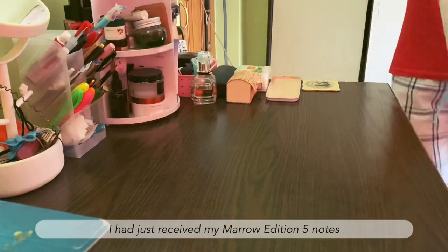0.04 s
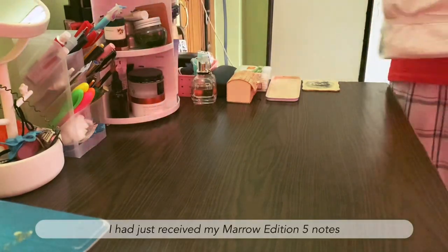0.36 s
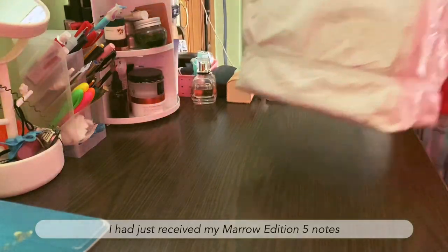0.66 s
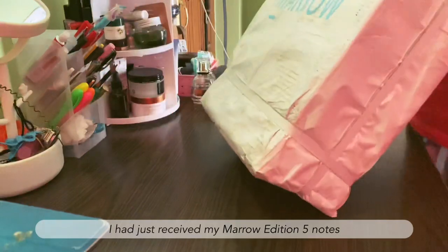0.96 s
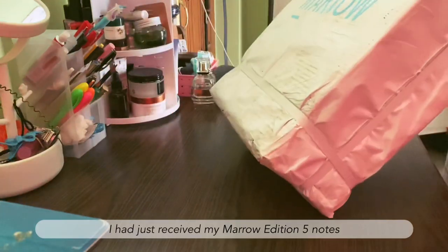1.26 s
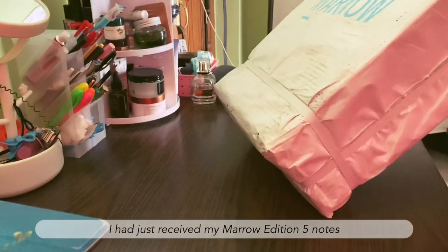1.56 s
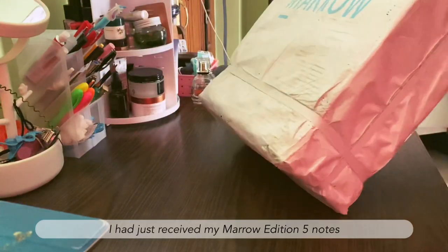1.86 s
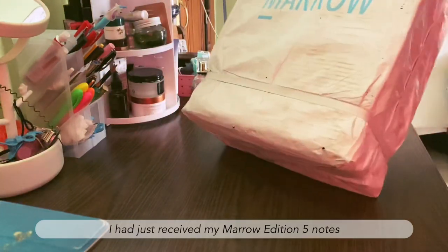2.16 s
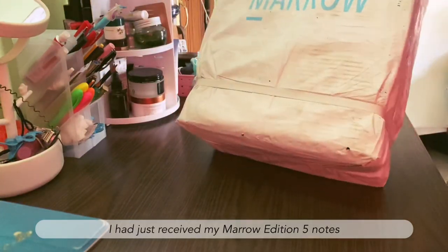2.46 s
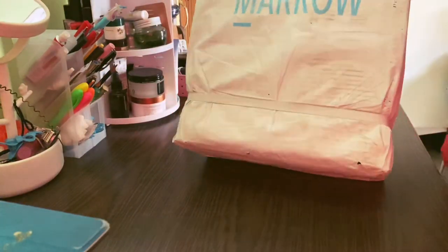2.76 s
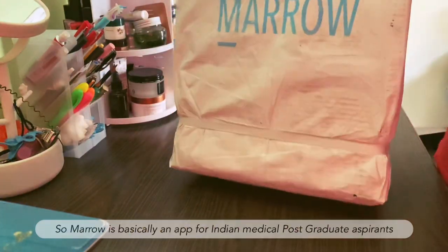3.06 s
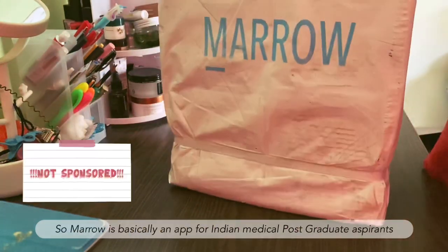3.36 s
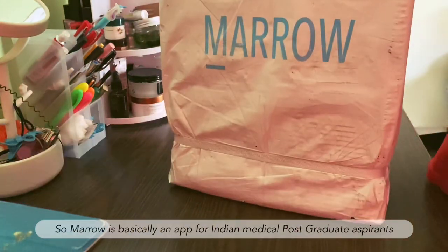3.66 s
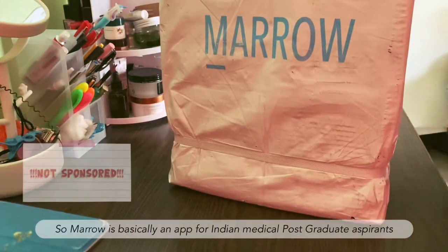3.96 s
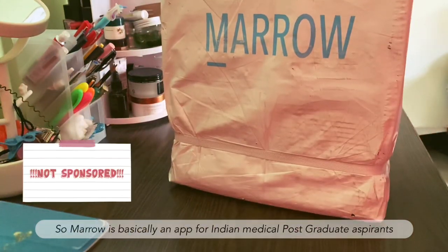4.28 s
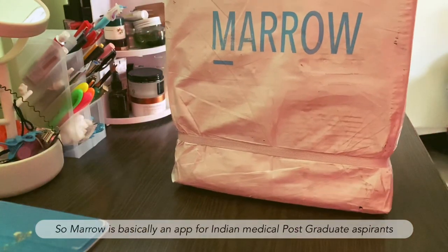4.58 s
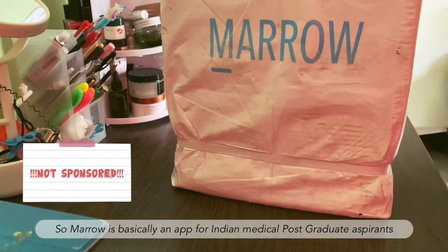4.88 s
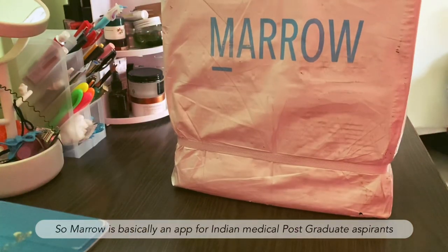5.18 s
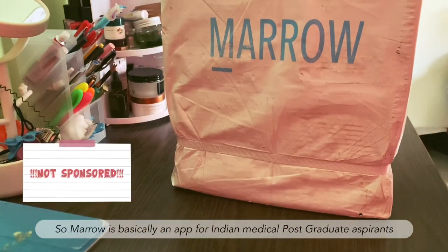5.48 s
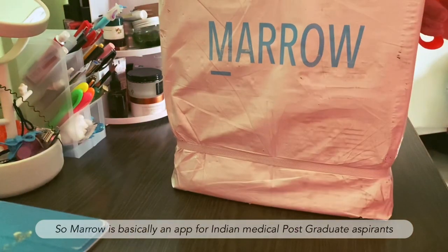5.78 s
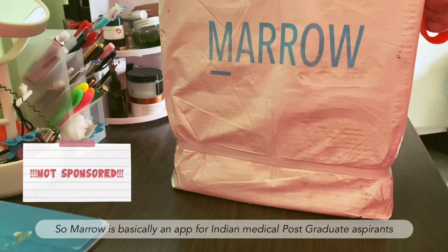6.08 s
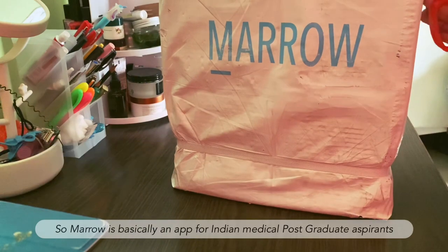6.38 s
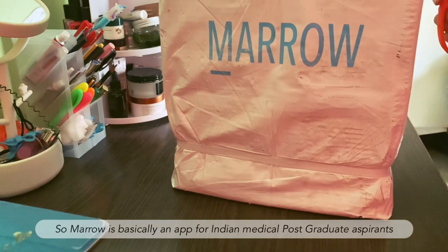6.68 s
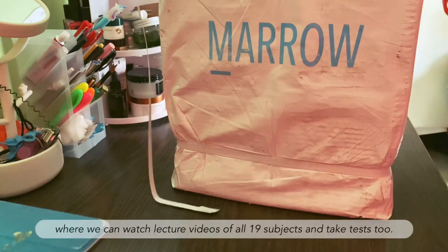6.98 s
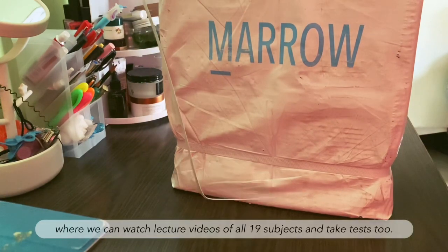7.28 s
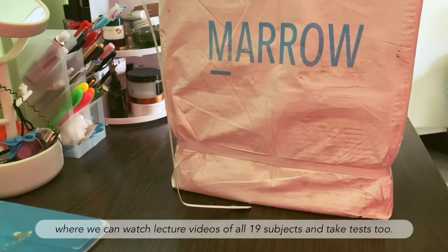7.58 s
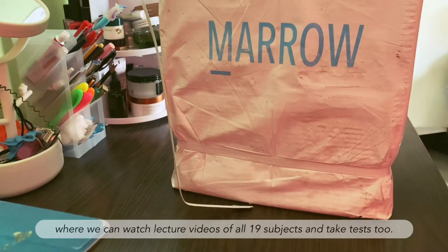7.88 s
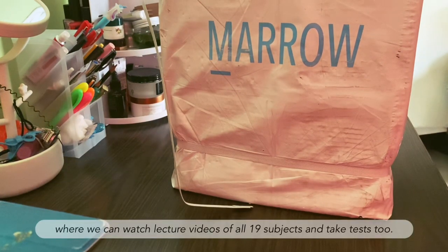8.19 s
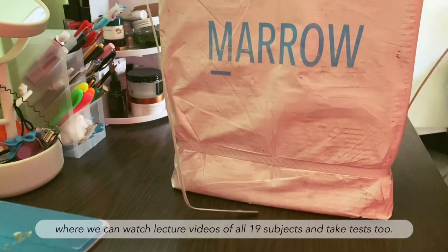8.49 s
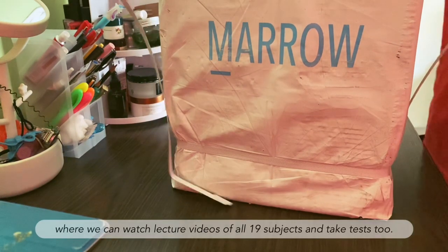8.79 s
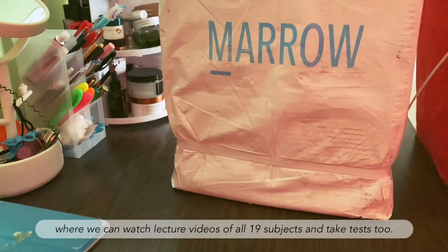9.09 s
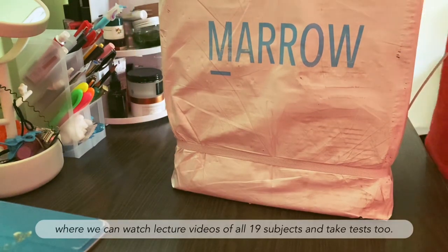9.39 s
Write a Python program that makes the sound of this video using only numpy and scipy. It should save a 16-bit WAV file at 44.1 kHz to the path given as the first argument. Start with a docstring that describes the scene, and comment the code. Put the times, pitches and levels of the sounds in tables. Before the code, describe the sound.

A heavy parcel of books in a plastic wrapper lands on a wooden desk with a ringing thud. It is swivelled with a soft scraping hiss, then settles with cracks and crinkles. Two hollow pops sound nearby. The parcel is slapped, and a cord drags, squeaks faintly and taps over the plastic, clacking on the desk. The microphone is close, in a small room with low ventilation rumble.

```python
"""Ventilation rumbles in a small room, around a phone standing on a wooden desk. A heavy parcel of books
in a plastic mailer lands and sets the desk's modes ringing. It is swivelled on its corner with a hiss of
friction, then settles upright as its seam cracks and its creases buckle. Two hollow pops sound nearby.
The parcel is slapped and the books knock inside; last, a cord drags and squeaks over the crinkling
wrapper by stick and slip, taps it, and clacks on the desk."""
import sys
import numpy as np
from scipy import signal
from scipy.fft import rfft, irfft, next_fast_len
from scipy.io import wavfile

SR = 44100
rng = np.random.default_rng(int(sys.argv[2]) if len(sys.argv) > 2 else 0)


def digitize_waveform(pressure):
    """Quantize a signal to 16-bit integers and store it at the path in sys.argv[1].

    Rows of a 2-D input are taken as channels; values are limited to [-1, 1].
    """
    field = np.atleast_2d(pressure).T
    bounded = np.clip(field, -1, 1)
    quanta = np.round(bounded * 32767).astype(np.int16)
    wavfile.write(sys.argv[1], SR, quanta)


N = 420713
TIME = np.arange(N) / SR

# Levels are relative within a source. Each row of a _COLOUR table: frequency in Hz, gain in dB.
AIR_COLOUR = [(25, -17.5), (52, -2.5), (80, -10), (125, -5), (215, -12.5), (270, -8), (360, -14.5),
              (470, -13), (800, -18), (1500, -24), (3000, -31), (7000, -44.5), (12000, -53), (16000, -62)]
# Low resonances of the room. Each row: frequency in Hz, width in Hz, level in dB.
ROOM_MODES = [(48.5, 12, -60.5), (112.2, 24.4, -63), (344, 87, -58)]

# The hand rubs the wrapper. Each row: start in seconds, length in seconds, level in dB.
HAND_RUBS = [(0.024, 0.23, -67), (0.553, 0.13, -59.5), (0.992, 0.053, -55), (1.168, 0.11, -59),
             (2.843, 0.32, -60), (4.659, 0.24, -57), (5.044, 0.075, -59.5), (5.468, 0.44, -62),
             (8.754, 0.49, -62), (9.2, 0.39, -60)]
# The cord drags over it. Each row: start in seconds, length in seconds, level in dB, resonance in Hz.
CORD_DRAGS = [(6.211, 0.039, -57, 2100), (6.342, 0.094, -54, 6800), (6.595, 0.12, -57, 4210),
              (6.733, 0.099, -56, 3600), (6.809, 0.063, -45.5, 3540), (6.928, 0.027, -49.5, 4500),
              (6.952, 0.097, -63.5, 3620), (7.114, 0.055, -49, 2450), (7.371, 0.11, -53.5, 2800),
              (7.473, 0.071, -77, 4190), (7.623, 0.038, -55, 5060), (8.09, 0.15, -65.5, 3960),
              (8.478, 0.07, -46.5, 3220), (8.558, 0.41, -59.5, 4400)]
RUSTLE_COLOUR = [(400, 5), (1000, -2), (2200, 2.5), (4000, -0.5), (6000, -5), (11000, -13), (16000, -18)]

# Modes of the desk top. Each row: frequency in Hz, level in dB, t60 in seconds.
DESK_MODES = [(64.5, -4, 0.37), (91, 5, 0.12), (109, -14.5, 0.52), (161.5, -8.5, 0.16), (228.4, -20, 0.24),
              (271.8, -13.5, 0.24), (310, -20, 0.26), (345, -5, 0.073), (382, -2.5, 0.053),
              (424, -9, 0.099), (564, -6.5, 0.09), (605, -6, 0.083), (663, -12, 0.053), (754, -37, 0.11),
              (860, -30, 0.18)]
# The parcel's edge, full weight, rebounds and rocking. Each row: start in seconds, push in dB.
PUSHES = [(0.743, -7.5), (.7520, -1.5), (0.7597, 0), (0.793, -32), (0.832, -15), (1.022, -35), (3.049, -40),
          (3.21, -33.5), (3.69, -50), (5.051, -36.5)]
BOOKS_COLOUR = [(25, -11), (52, -5), (80, -15), (120, -12), (180, 1), (380, -13), (620, -10.5), (850, -15),
                (2000, -38.5)]
# The wrapper is crushed under the weight. Each row: start in seconds, level in dB, t60 in seconds.
CRUSHES = [(0.7426, -24, 0.075), (.754, -22.5, 0.07), (.767, -20.5, 0.074), (.80, -36.5, 0.37),
           (.915, -46.5, 0.25)]
CRUSH_COLOUR = [(250, -28), (700, 0), (1050, 4), (1400, 5), (1750, -1.5), (2400, 2.5), (3800, -3),
                (6000, -10.5), (11000, -16.5), (16000, -23)]
# Edge and cord knock on the desk. Each row: start in seconds, level in dB, t60 in seconds.
KNOCKS = [(.7432, -16, .035), (5.049, -41, .08), (7.2, -41, 0.028), (8.7345, -34, .028), (8.879, -40, .03),
          (8.8991, -43, 0.056), (9.3595, -48, .025)]
KNOCK_COLOUR = [(120, -7), (350, -5.5), (620, 3.5), (850, 3), (1300, 2), (1900, -4.5), (2800, -15),
                (5000, -20), (12000, -34)]

# Creases buckle; the cord taps the wrapper. Each row: start in seconds, level in dB, ring in Hz.
CREASES = [(1.003, -44.5, 2584), (1.18, -53.5, 3600), (1.354, -64, 4400), (2.861, -47, 1700),
           (2.873, -50, 1700), (2.91, -46, 1730), (3.067, -43, 2800), (3.073, -49, 2000),
           (3.154, -44.5, 1910), (3.165, -41.5, 1720), (3.176, -45.5, 1500), (3.19, -47, 2200),
           (3.2, -35.5, 1750), (3.225, -41, 1700), (3.242, -39.5, 2260), (3.248, -48, 1700),
           (3.302, -49, 2600), (3.369, -50, 2780), (4.698, -48, 2100), (4.771, -53, 2400),
           (5.049, -53, 1500), (5.474, -53.5, 2480), (5.631, -50.5, 3280), (5.956, -52, 4300),
           (6.027, -58.5, 3820), (6.175, -55.5, 4200), (6.219, -55, 3200), (6.333, -52, 4000)]
CORD_TAPS = [(6.65, -53.5, 4050), (6.744, -60, 2640), (6.848, -41.5, 2870), (6.935, -56.5, 4400),
             (6.978, -55, 2400), (7.083, -50.5, 2620), (7.121, -50, 2330), (7.338, -63.5, 2790),
             (7.422, -59, 2830), (7.596, -59, 4270), (7.918, -50, 2620), (8.488, -45.5, 2950),
             (8.522, -36.5, 3200), (8.622, -50, 2480), (8.663, -55.5, 3180), (8.734, -36, 2500),
             (8.813, -57, 3300), (8.879, -45, 1880), (8.9, -54, 2600), (9.036, -49, 2230),
             (9.268, -50.5, 3040), (9.359, -47.5, 2000)]

# The corner slides as the parcel turns. Each row: time in seconds, level in dB.
SWIVEL = [(1.57, -75), (1.642, -56), (1.728, -51), (1.914, -46), (2.15, -48), (2.646, -50.5), (2.716, -70),
          (2.76, -56.5)]
# Resonances of the wrapper under that corner. Each row: frequency in Hz, width in Hz, level in dB.
SLIDE_MODES = [(1510, 200, -9.5), (2000, 420, -10), (2865, 260, -11), (3720, 450, -13), (4570, 380, -17),
               (6850, 420, -15)]
SLIDE_COLOUR = [(400, -2.5), (900, 2), (1250, 4), (1600, 3.5), (2800, 6.5), (4200, 3), (5500, -4),
                (7200, -6.5), (11000, -8.5), (16000, -14)]
# The bottom seam unfolds. Each row: start in seconds, level in dB, t60 in seconds.
SEAM_CRACKS = [(3.0062, -30.5, .014), (3.0095, -39, .012), (3.0668, -38, .008)]
SEAM_COLOUR = [(300, -8), (800, -1), (1150, 1), (1500, 7), (2000, -3), (3000, -10), (4500, -8), (6000, -10),
               (7500, -9), (9500, -23), (16000, -32)]
CREAK_COLOUR = [(50, -2), (150, 1), (400, 2.5), (750, 4), (1500, -9), (3000, -8), (5000, -17),
                (8000, -23.5)]

# Pops. Each row: start in seconds, level in dB, pitch in Hz, t60 in seconds, left minus right in dB.
POPS = [(4.8343, -14.5, 1150, 0.0045, -13.5), (5.0496, -21, 1450, 0.0026, -10)]

SLAP_COLOUR = [(40, -7), (90, 0), (185, -6), (270, -9.5), (410, 2), (620, 2), (950, -2), (1300, -4.5),
               (1800, -4), (2500, -4.5), (3300, -11.5), (4400, -12), (6000, -19.5), (11500, -22),
               (16000, -25)]
SLAP_SHADOW_COLOUR = [(2000, -1), (3500, -3.5), (7000, -6.5), (15000, -5)]  # the parcel shades the walls from the smack
# Modes of the slapped stack of books. Each row: frequency in Hz, level in dB, t60 in seconds.
STACK_MODES = [(62.4, -31, .2), (189, -26, .12), (325, -33, 0.078), (417, -13.5, .024), (489, -31, .17),
               (771, -37, 0.17), (865, -42, 0.11), (926, -35, 0.17), (1290, -41, .15), (1540, -39, 0.16),
               (1800, -41, 0.14), (1870, -34.5, 0.08), (2060, -34, .1)]
# The parcel gives under the slap. Each row: start in seconds, level in dB, t60 in seconds.
GIVES = [(6.2486, -31, 0.025), (6.2553, -29.5, 0.047), (6.264, -32, 0.13)]
GIVE_COLOUR = [(50, -8), (110, 6), (200, -2), (330, -5), (440, 1.5), (620, -0.5), (900, 1), (1400, 0),
               (2100, -0.5), (2700, -4), (3600, -10), (4500, -12), (6000, -21), (11000, -29), (16000, -34)]

# The cord catches on the film. Each row: start in seconds, length in seconds, level in dB, pitch in Hz.
SQUEAKS = [(6.632, 0.031, -59, 3940), (6.638, .02, -58, 5330), (6.82, .035, -54, 3600),
           (6.827, .022, -52, 2290), (6.928, .025, -55, 4500), (7.117, .035, -53, 2250),
           (7.137, .03, -55, 2750), (7.39, .06, -60, 2950)]
# The wrapper is gripped or pulled. Each row: start in seconds, length in seconds, level in dB.
CRINKLES = [(6.8, .08, -58), (7.201, 0.066, -55), (8.484, 0.066, -49), (8.57, .13, -60.5),
            (8.741, 0.19, -57), (9.283, 0.13, -63)]
# The cord's stiff end hits the desk. Each row: start in seconds, level in dB, t60 in seconds.
CORD_CLACK = [(7.1995, -26.5, 0.017)]
CLACK_COLOUR = [(300, -19), (800, -11), (1080, -1.5), (1550, -8), (2150, 3), (2600, 3), (3100, -11),
                (3700, -10), (4200, -12), (5000, -17), (6200, -12), (6900, -6), (8100, -8), (9500, -22),
                (12000, -21), (16000, -26)]

# Reflections off the desk and the jars on it. Each row: delay in seconds, gain in dB.
ECHOES = [(.0012, -33), (.0037, -16.5), (.0096, -16.5)]
# Reverberation time. Each row: frequency in Hz, t60 in seconds.
ROOM_T60 = [(100, 0.39), (1000, 0.24), (3000, 0.33), (12000, 0.35)]
ROOM_COLOUR = [(60, -7), (120, -6.5), (220, -1), (500, -3), (1300, 1), (2000, -0.5), (3000, -2.5),
               (7000, -0.5), (15000, -2.5)]
PORT_COLOUR = [(5500, 0), (7000, 2.5), (8500, 0.5), (11000, 3.5), (15000, 3.5)]  # treble lift of both microphone ports
SIDE_COLOUR = [(60, -19), (110, -12.5), (380, -6.5), (700, -1), (1300, -1), (2400, -4.5), (4400, -8),
               (5500, 0), (7000, -29), (15000, -21)]  # side relative to mid
# Imbalance of the ports. Each row: frequency in Hz, left minus right in dB.
PORT_BALANCE = [(100, -1.2), (200, -2), (380, -4.5), (700, -1), (1300, -1), (2400, 1.5), (4400, 2.2),
                (9000, .3)]

FOLD_HZ, TOP_HZ = 2160, 15900  # ring of a reference fold; upper limit of the phone


def undb(db):
    """Decibels to amplitude ratio."""
    return 10 ** (np.asarray(db) / 20)


def unit(x):
    """Normalisation to rms 1."""
    return x / np.sqrt(np.mean(x ** 2))


def at_hz(points, hz):
    """Interpolation of (Hz, value) points on a log-frequency axis."""
    f, value = np.transpose(points)
    return np.interp(np.log(np.maximum(hz, 1)), np.log(f), value)


def colour(x, points, size=4096):
    """Minimum-phase filtering by (Hz, dB) points, through the folded cepstrum."""
    gain = undb(at_hz(points, np.fft.rfftfreq(size, 1 / SR)))
    cepstrum = irfft(np.log(gain))
    cepstrum[1:size // 2] *= 2
    cepstrum[size // 2 + 1:] = 0
    response = irfft(np.exp(rfft(cepstrum)))
    return signal.oaconvolve(x, response[None], axes=-1)[:, :x.shape[1]]


def band(x, lo_hz, hi_hz, order=2):
    """Butterworth band-pass filtering."""
    edges = [lo_hz, min(hi_hz, SR / 2 - 1)]
    return signal.sosfilt(signal.butter(order, edges, "band", fs=SR, output="sos"), x)


def noise(count):
    """Uncorrelated white noise for mid and side."""
    return rng.standard_normal((2, count))


def fade(t, t60):
    """Exponential decay, 60 dB down after t60."""
    return np.exp(-np.log(1000) * t / t60)


def walk(rate, count=N):
    """Random modulation of rms 1, through rate knots a second."""
    knots = rng.standard_normal(4096)
    return unit(np.interp(TIME[:count] * rate, np.arange(len(knots)), knots))


def arch(length_s, taper=0.65, skew=0.88):
    """Envelope of one stroke: a skewed sine arch that peaks just before its middle."""
    return np.abs(np.sin(np.pi * (TIME[:int(length_s * SR)] / length_s) ** skew)) ** taper


def add(track, s, sound):
    """Superposition of a sound on a track at s seconds."""
    start = int(s * SR)
    track[:, start:start + sound.shape[1]] += sound[:, :track.shape[1] - start]


def modes(table, t):
    """Free vibration: a sum of damped sinusoids from (Hz, dB, t60) rows."""
    return sum(undb(db) * np.sin(2 * np.pi * hz * t) * fade(t, t60) for hz, db, t60 in table)


def burst(points, t60, count=16384):
    """Densely overlapping modes decay like coloured noise; starts near rms 1."""
    envelope = fade(TIME[:count], t60)
    return unit(colour(noise(count) * envelope, points)) * np.sqrt(np.mean(envelope ** 2))


def blows(table, points):
    """Impact excitation: one burst of the given colour for each (s, dB, t60) row."""
    out = np.zeros((2, N))
    for s, db, t60 in table:
        add(out, s, undb(db) * burst(points, t60))
    return out


def grains(count, rate, spread_db):
    """Shot noise: tiny slips of random size, on average rate a second."""
    slips = noise(count) * (rng.random(count) < rate / SR)
    hit = np.flatnonzero(slips[0])
    slips[:, hit] *= undb(spread_db * np.minimum(rng.exponential(size=len(hit)), 4))
    return unit(slips)


def ventilation(level_db=-51.5, waver_db=0.9):
    """Broadband ventilation noise excites the room's low resonances, under faint hiss."""
    out = undb(level_db) * unit(colour(noise(N), AIR_COLOUR))
    drive = noise(N)
    for hz, width_hz, db in ROOM_MODES:
        out += undb(db + waver_db * walk(14)) * unit(band(drive, hz - width_hz / 2, hz + width_hz / 2))
    return out


def film_resonance(hz, width_hz, count, wander, rate):
    """A randomly driven resonance gives narrow-band noise; its pitch wanders with the film's tension."""
    smooth = signal.butter(2, min(width_hz / 2, SR / 4), fs=SR, output="sos")
    drive = signal.sosfilt(smooth, noise(count) + 1j * noise(count))
    phase = 2 * np.pi * np.cumsum(hz * (1 + wander * walk(rate, count))) / SR
    return unit(np.real(drive * np.exp(1j * phase)))


def stroke(slips, s, length_s, hz, treble_db, hiss_db, film_db, width_share, split_hz=6000, catch_db=4):
    """Stick-slip friction: slips hiss while the stretched film catches and rings in spurts."""
    gain = arch(length_s)
    count = len(gain)
    slips = np.take(slips, int(s * SR) + np.arange(count), axis=1, mode="wrap")
    film = film_resonance(hz, hz * width_share, count, wander=0.083, rate=60)
    film = unit(film * undb(catch_db * walk(137, count)))
    hiss = unit(band(slips, 600, split_hz))
    treble = unit(band(slips, split_hz, TOP_HZ, order=3))
    return gain * (undb(hiss_db) * hiss + undb(film_db) * film + undb(treble_db) * treble)


def rustle(hand_db=-7, cord_db=-5):
    """Friction on the wrapper: mostly broad hiss under the hand, more resonant under the cord."""
    out = np.zeros((2, N))
    slips = colour(grains(N, rate=2000, spread_db=0.5), RUSTLE_COLOUR) * undb(3 * walk(110))
    for s, length_s, db in HAND_RUBS:
        rub = stroke(slips, s, length_s, 1540, treble_db=-2.5, hiss_db=2.5, film_db=-12, width_share=0.17)
        add(out, s, undb(db + hand_db) * rub)
    for s, length_s, db, hz in CORD_DRAGS:
        treble_db = -5 + 5.5 * np.log2(hz / FOLD_HZ)  # a faster drag rings higher and hisses more
        drag = stroke(slips, s, length_s, hz, treble_db, hiss_db=0, film_db=-2.5, width_share=0.27)
        add(out, s, undb(db + cord_db) * drag)
    return out


def crush(t60, count=16384):
    """Many folds collapse in quick succession as decaying shot noise; starts near rms 1."""
    envelope = fade(TIME[:count], t60)
    folds = grains(count, rate=5000, spread_db=1) * envelope
    return unit(colour(folds, CRUSH_COLOUR)) * np.sqrt(np.mean(envelope ** 2))


def desk(contact_s):
    """Modal response to a half-sine force: a longer contact excites only the low modes."""
    t = TIME[:SR // 2]
    push = np.sin(np.pi * t[t < contact_s] / contact_s)
    return np.outer([1, 0], signal.fftconvolve(modes(DESK_MODES, t), push / push.sum()))


def landing(desk_db=-8, books_db=-14, crush_db=2, contact_s=0.00098, rest_s=0.955, rest_t60=0.1):
    """Impacts ring the desk until the resting load damps it; the books thud and crush the wrapper."""
    out = np.zeros((2, N))
    for s, db in PUSHES:
        ring = desk(contact_s * 2 ** (-db / 18))  # contact time doubles for each 18 dB less force
        since_rest = np.maximum(TIME[:ring.shape[1]] - max(rest_s - s, 0), 0)
        damping = fade(since_rest, rest_t60 if s < rest_s else 4 * rest_t60)
        add(out, s, undb(db + desk_db) * ring * damping)
        add(out, s, undb(db + books_db) * burst(BOOKS_COLOUR, t60=0.083))
    for s, db, t60 in CRUSHES:
        add(out, s, undb(db + crush_db) * crush(t60))
    return out


def knocks():
    """Impacts of the parcel's edge and the cord excite quickly damped vibration in the wood."""
    return blows(KNOCKS, KNOCK_COLOUR)


def snap(hz, treble_db, rise_s=0.00053, body_lag_s=0.00087, count=2048):
    """A fold lets go; bending waves disperse, so the bright tick and ring precede the dull body."""
    t = TIME[:count]
    attack = 1 - np.exp(-t / rise_s)
    release = undb(-8) * unit(np.outer([1, 0], signal.unit_impulse(count)))
    tick = unit(band(release + unit(noise(count) * attack * fade(t, 0.019)), 4800, 10800, order=1))
    ring = unit(band(release + unit(noise(count) * attack * fade(t, 0.0082)), hz / 2.22, hz * 1.46))
    body = unit(band(noise(count), 485, 1120) * attack * fade(t, 0.021))
    octaves = np.log2(hz / FOLD_HZ)  # smaller folds ring higher, with more tick and less body
    out = ring + undb(treble_db + 13 * octaves) * tick
    add(out, body_lag_s, undb(-3 - 9 * octaves) * body)
    return out


def snaps(gain_db=-11, crease_treble_db=-16, cord_treble_db=-9.5, stray_db=-71):
    """Buckling creases and cord taps shock the film; the cord, the harder striker, sounds brighter."""
    out = np.zeros((2, N))
    for table, treble_db in (CREASES, crease_treble_db), (CORD_TAPS, cord_treble_db):
        for s, db, hz in table:
            add(out, s, undb(db + gain_db) * snap(hz, treble_db))
    # Faint stray ticks: only those drawn before the scene ends are heard.
    for when, size, pitch in rng.uniform(-0.78, 1, (12, 3)):
        s = min(np.interp(when, [-1, 1], [8, 17]), TIME[-1])
        hz = 2640 * 2 ** (0.73 * pitch)
        add(out, s, undb(stray_db - 11.5 * size) * snap(hz, cord_treble_db))
    return out


def glide(gain, split_hz=6000, pivot_hz=2800, waver_db=2.5, fast_db=-45.5, range_db=4, count=65536):
    """Sliding friction hisses and drives wavering resonances; faster sliding is louder and brighter."""
    slips = unit(colour(grains(count, rate=6900, spread_db=-0.5), SLIDE_COLOUR))
    slips *= undb(1.1 * walk(29.9, count))
    low = unit(band(slips, 440, split_hz, order=4))[:, :len(gain)]
    high = unit(band(slips, split_hz, 19500, order=4))[:, :len(gain)]
    speed_db = np.clip(20 * np.log10(gain + 1e-9) - fast_db, -range_db, 0) + range_db / 2
    for hz, width_hz, mode_db in SLIDE_MODES:
        level = undb(mode_db + waver_db * walk(13.74, count))
        ring = level * film_resonance(hz, width_hz, count, wander=0.04, rate=6)
        tilt_db = 0.8 * speed_db * np.log2(hz / pivot_hz)
        low += undb(tilt_db) * ring[:, :len(gain)]
    treble_db = np.interp(gain, undb([fast_db - range_db, fast_db]), [-5, 3])
    return gain * (low + undb(treble_db) * high)


def slide(gain_db=-3.5, nudge_s=4.325, nudge_db=-53.5):
    """The corner rubs over the wood as the parcel is swivelled and later nudged straight."""
    out = np.zeros((2, N))
    s, db = np.transpose(SWIVEL)
    swivel = undb(np.interp(np.arange(s[0], s[-1], 1 / SR), s, db))
    nudge = undb(nudge_db) * arch(length_s=0.305, taper=1.1, skew=0.92)
    add(out, s[0], glide(swivel))
    add(out, nudge_s, glide(nudge))
    return undb(gain_db) * out


def seam_cracks():
    """The stiff bottom seam releases elastic energy in brief cracks as it unfolds."""
    return blows(SEAM_CRACKS, SEAM_COLOUR)


def settle(start_s=3.14, length_s=0.256, ramp_s=0.041, level_db=-43.5, crinkle_db=-18, count=16384):
    """Under load the bottom yields in tiny slips, creaking and crinkling, then relaxes."""
    out, t = np.zeros((2, N)), TIME[:count]
    creak = unit(colour(grains(count, rate=1300, spread_db=0.5), CREAK_COLOUR))
    crinkle = unit(colour(grains(count, rate=1700, spread_db=-1), RUSTLE_COLOUR))
    envelope = np.clip(np.minimum(t, length_s - t) / ramp_s, 0, 1) * fade(t, t60=1)
    add(out, start_s, undb(level_db) * envelope * (creak + undb(crinkle_db) * crinkle))
    return out


def pops(rise_s=0.00077, gain_db=7):
    """A heavily damped resonance lasts a few cycles: a hollow pop, given as left and right."""
    out, t = np.zeros((2, N)), TIME[:SR // 10]
    attack = 1 - np.exp(-(t / rise_s) ** 2)
    for s, db, hz, t60, pan_db in POPS:
        ring = np.sin(2 * np.pi * hz * t) * fade(t, t60) * attack
        add(out, s, undb(db + gain_db + np.array([[pan_db], [-pan_db]]) / 2) * ring)
    return out


def slap(start_s=6.2393, smack_db=-16, smack_t60=0.022, gain_db=1, stack_lag_s=0.00123):
    """An impact smacks the taut wrapper, which gives with a duller crunch; the books' modes answer."""
    smack = blows([(start_s, smack_db, smack_t60)], SLAP_COLOUR)
    out = undb(gain_db) * (smack + blows(GIVES, GIVE_COLOUR))
    add(out, start_s + stack_lag_s, np.outer([1, 0], modes(STACK_MODES, TIME[:SR // 4])))
    return out


def squeaks(width_share=0.15):
    """The cord's stick-slip motion briefly locks onto one resonance of the film."""
    out = np.zeros((2, N))
    for s, length_s, db, hz in SQUEAKS:
        gain = arch(length_s)
        ring = film_resonance(hz, hz * width_share, len(gain), wander=0.0246, rate=50)
        add(out, s, undb(db) * gain * ring)
    return out


def crinkles(spurt_db=3, count=16384):
    """Small folds buckle one by one, in uneven spurts."""
    out = np.zeros((2, N))
    for s, length_s, db in CRINKLES:
        gain = arch(length_s)
        folds = colour(grains(count, rate=600, spread_db=2), RUSTLE_COLOUR)
        folds *= undb(spurt_db * walk(62, count))
        add(out, s, undb(db) * gain * unit(folds[:, :len(gain)]))
    return out


def cord_clack():
    """A hard, short contact has a wide spectrum: the cord's stiff end clacks on the desk."""
    return blows(CORD_CLACK, CLACK_COLOUR)


def reflect(x):
    """Early echoes interfere with the direct sound and ripple its spectrum."""
    out = x.copy()
    for delay_s, db in ECHOES:
        add(out, delay_s, undb(db) * x)
    return out


def room(mid, gap_s=0.0081, build_s=0.0037):
    """Diffuse reverberation from near walls, as mid and side; each octave decays at its own rate."""
    t, tail = TIME[:SR * 3 // 4], 0
    for hz in 62.5 * 2. ** np.arange(9):
        octave = band(noise(len(t)), hz / np.sqrt(2), hz * np.sqrt(2))
        tail = tail + octave * fade(t, at_hz(ROOM_T60, hz))
    tail *= np.clip((t - gap_s) / build_s, 0, 1)
    tail = colour(tail / np.sqrt(np.sum(tail ** 2) / 2), ROOM_COLOUR)
    return signal.oaconvolve(mid[None], tail, axes=-1)[:, :N]


def ports(pair):
    """Sum and difference turn mid and side into left and right, each with its own colour."""
    pair = colour(pair, PORT_COLOUR)
    mid, side = pair[:1], colour(pair[1:], SIDE_COLOUR)
    left = colour(mid + side, [(hz, db / 2) for hz, db in PORT_BALANCE])
    right = colour(mid - side, [(hz, -db / 2) for hz, db in PORT_BALANCE])
    return np.vstack([left, right])


def port_lag(x, lag_s=0.000247, above_hz=7100):
    """Group delay: in the high treble the left port lags the right."""
    size = next_fast_len(N + 4096)
    phase = np.pi * lag_s * np.maximum(np.fft.rfftfreq(size, 1 / SR) - above_hz, 0)
    return irfft(rfft(x, size) * np.exp(1j * np.outer([-1, 1], phase)), size)[:, :N]


def scene():
    """Direct and reverberant sound superpose; the pops, farther off, merge with their echoes."""
    thud, smack, pop = landing(), slap(), pops()
    ticks = snaps() + knocks()
    cracks = cord_clack() + seam_cracks()
    rubs = slide() + rustle() + crinkles() + squeaks() + settle()
    to_walls = (undb(-8) * thud + undb(-5) * colour(smack, SLAP_SHADOW_COLOUR)
                + undb(-8.5) * ticks + undb(-13) * cracks + undb(-7) * rubs)
    pop_tail = room(undb(1.5) * pop.mean(axis=0), gap_s=0.0012, build_s=0.0022)
    near = thud + reflect(smack + ticks + cracks + rubs)
    return port_lag(ports(near + room(to_walls[0]) + pop_tail + ventilation()) + pop)


def record(dry):
    """Band limiting and soft saturation: the phone cuts deep bass, rounds peaks and cuts the top."""
    thinned = signal.sosfilt(signal.butter(3, 42, "high", fs=SR, output="sos"), dry)
    rounded = thinned / (1 + thinned ** 4) ** (1 / 4)
    return signal.sosfilt(signal.ellip(8, .2, 70, TOP_HZ, fs=SR, output="sos"), rounded)


dry = scene()
out = record(dry)
digitize_waveform(out)
```